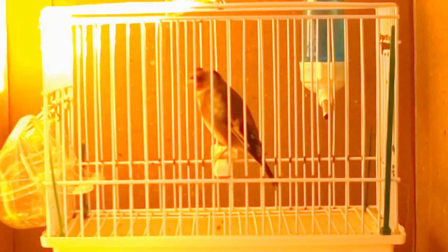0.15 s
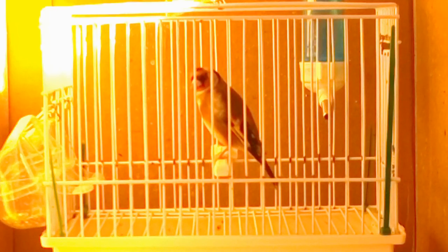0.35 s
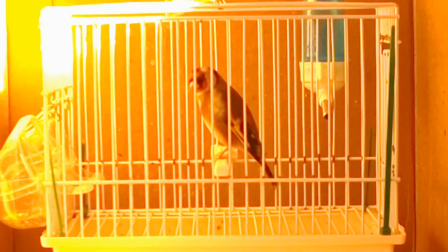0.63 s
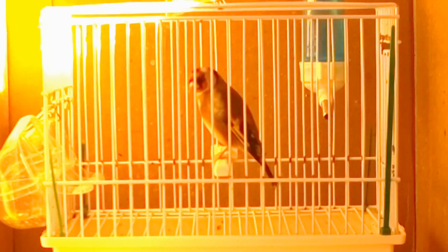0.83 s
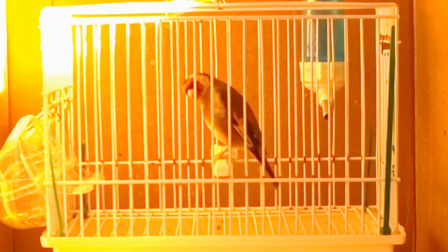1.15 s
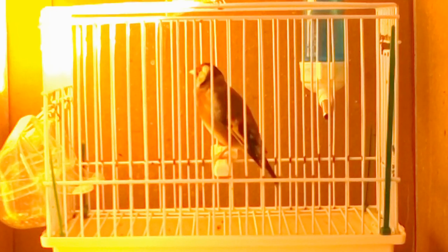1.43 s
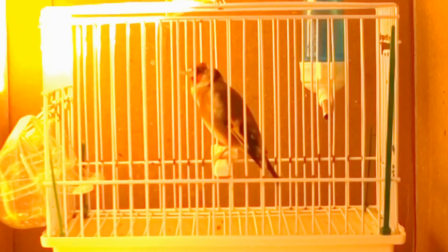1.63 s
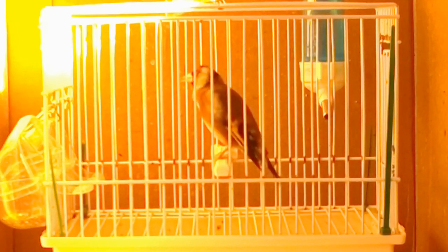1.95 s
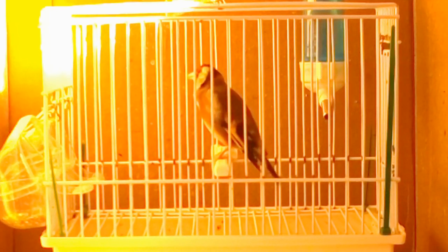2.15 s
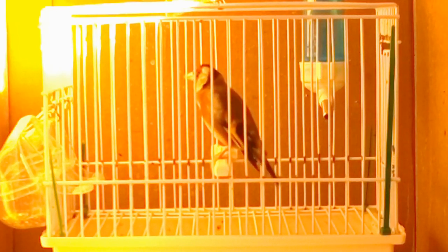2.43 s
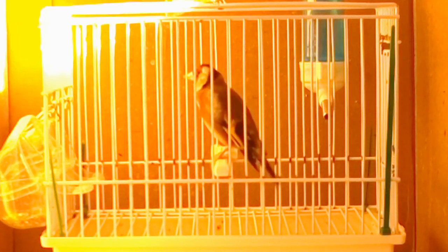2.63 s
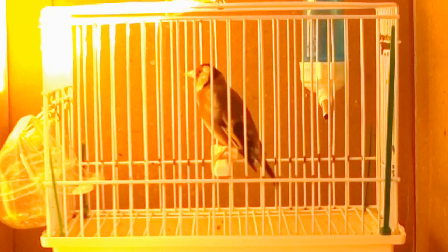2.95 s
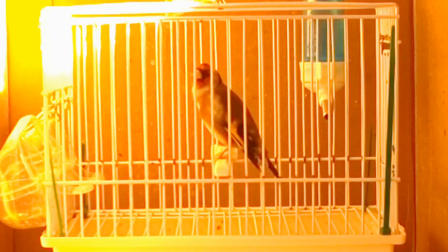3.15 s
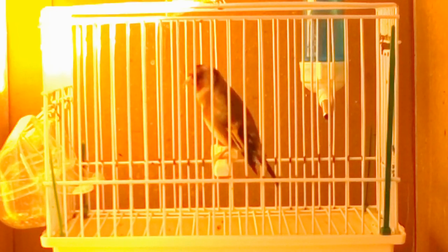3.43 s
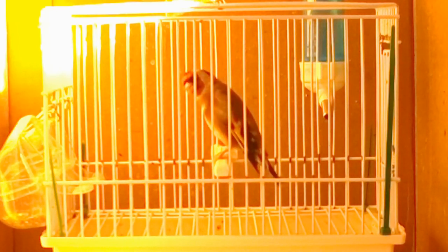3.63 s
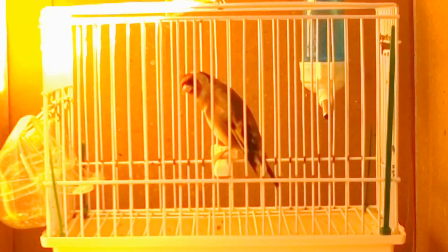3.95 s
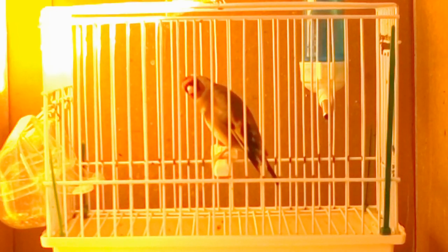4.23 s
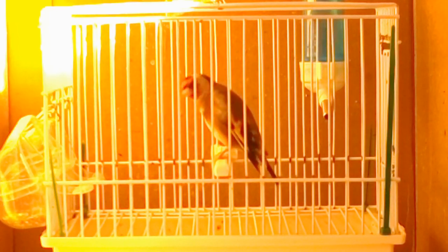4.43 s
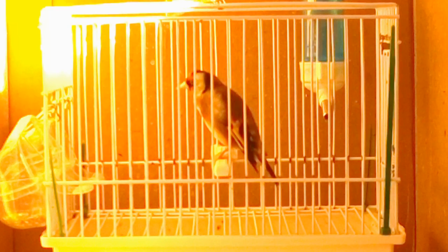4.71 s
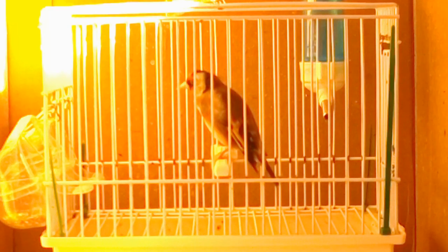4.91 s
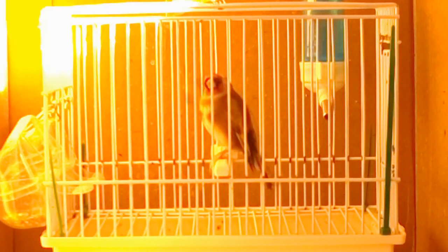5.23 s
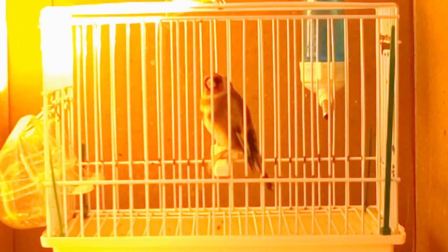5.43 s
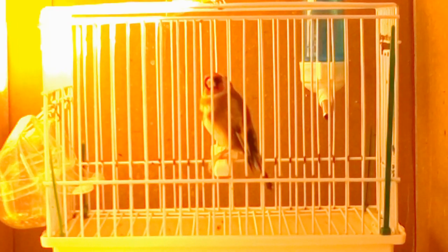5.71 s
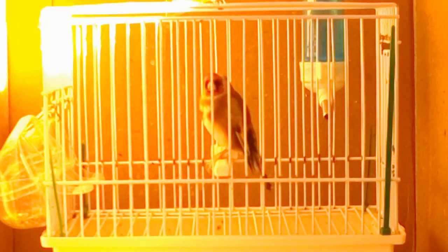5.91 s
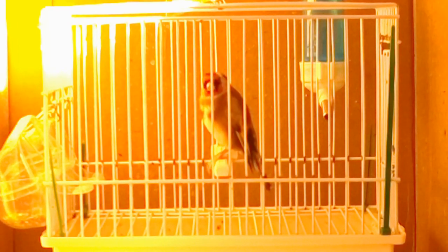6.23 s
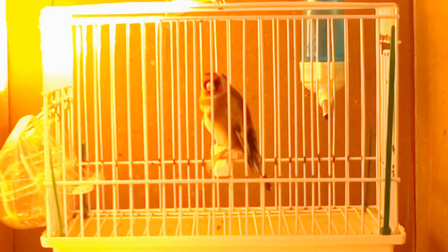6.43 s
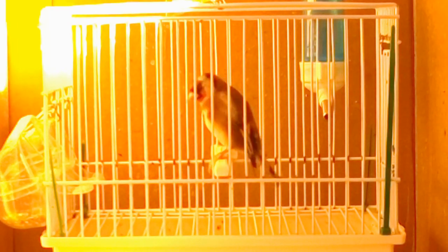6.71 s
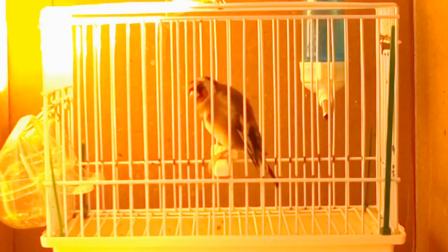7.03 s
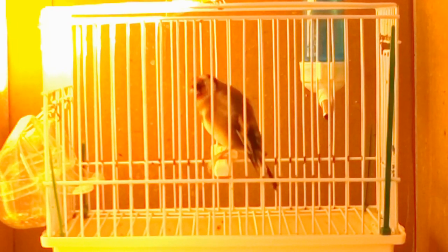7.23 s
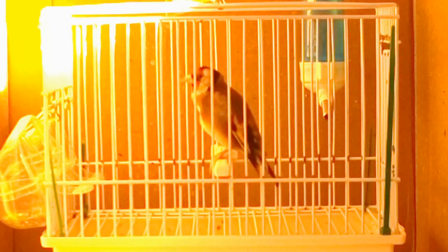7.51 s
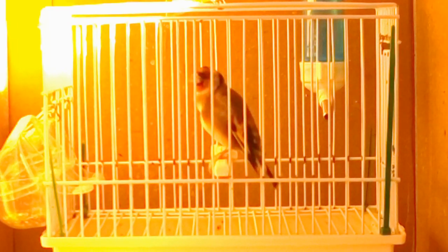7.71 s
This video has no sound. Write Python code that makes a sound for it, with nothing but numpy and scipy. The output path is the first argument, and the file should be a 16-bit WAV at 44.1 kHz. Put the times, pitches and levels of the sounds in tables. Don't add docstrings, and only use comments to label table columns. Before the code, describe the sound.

Indoors, faint distant chirps sound above an airy fan hum and low muffled knocks. After a moment a nearby songbird sings very high, loud, quick phrases: sweeping whistles, repeated downward swoops, sharp ticks and a rattling trill dropping in pitch, all ringing off bare walls. A pause leaves the fan and far birds; finally the bird buzzes twice, lifting after each. The close microphone distorts on peaks.

```python
import sys
import numpy as np
from scipy import signal
from scipy.fft import rfft, irfft, next_fast_len
from scipy.io import wavfile
from scipy.ndimage import uniform_filter1d

SR = 44100
rng = np.random.default_rng(int(sys.argv[2]) if len(sys.argv) > 2 else 0)


def natural_amplitude(level_db):
    exponent = np.asarray(level_db, float) / 20
    return 10 ** exponent


def dump(signal):
    limited = np.clip(np.atleast_2d(signal).T, -1, 1)
    pcm = np.round(limited * 32767).astype(np.int16)
    wavfile.write(sys.argv[1], SR, pcm)


N = 347067


def unit(x):
    return x / np.sqrt(np.mean(x ** 2) + 1e-20)


def along(points, hz):
    f, v = np.transpose(points)
    return np.interp(np.log(hz + 1), np.log(f + 1), v)


def level(rows):
    s, db = np.transpose(rows)
    return natural_amplitude(np.interp(np.arange(N) / SR, s, db))


def noise(response):
    m = next_fast_len(N)
    spectrum = rfft(rng.standard_normal(m)) * response(np.fft.rfftfreq(m, 1 / SR))
    return unit(irfft(spectrum, m)[:N])


def air_and_motor():
    # (frequency [Hz], density [dB per Hz])
    rush_colour = [(53, -46), (90, -22.5), (129, -6), (184, -7), (202, -13), (235, 1.5), (258, -3.5),
                   (445, -4), (558, -7.5), (636, -4), (945, -7), (1040, -7.5), (2460, -16.5), (2760, -18),
                   (8060, -23), (10500, -34), (17700, -120)]
    # (frequency [Hz], width [Hz], level [dB])
    resonances = [(237.4, 9.1, -48), (641, 33, -49), (750.5, 6.8, -52), (916, 14, -49), (958.5, 21, -46.5)]
    # (time [s], level [dB])
    fan_swell = [
        (0, -34),
        (4.97, -33.5),
        (5.08, -37.5),
        (5.44, -34.5),
        (5.79, -34),
        (7.87, -34.1),
    ]
    sound = noise(lambda f: natural_amplitude(along(rush_colour, f)))
    for centre, width, db in resonances:
        drone = noise(lambda f: 1 / (1 + (2 * (f - centre) / width) ** 2))
        sound = sound + natural_amplitude(db + 33) * drone
    return level(fan_swell) * sound


def building_thumps():
    # (frequency [Hz], density [dB per Hz])
    rumble_colour = [(15, -9), (30, 2.5), (55, 8), (90, -1)]
    # (time [s], peak level [dB])
    thumps = [(.13, -54), (.28, -58), (.42, -53), (.83, -54), (1.69, -57), (2.03, -45), (2.17, -61),
              (2.4, -60), (3.032, -50), (3.28, -45), (3.52, -52), (4.64, -46), (5.11, -59), (6.0, -62),
              (6.47, -54), (6.97, -59), (7.55, -58)]
    rise_db_s, fall_db_s, still_db = 155, 110, -72
    rumble = noise(lambda f: natural_amplitude(along(rumble_colour, f)) * (f < 100))
    t = np.arange(N) / SR
    lumps = natural_amplitude(still_db)
    for s, db in thumps:
        lumps = lumps + natural_amplitude(db + np.minimum(rise_db_s * (t - s), fall_db_s * (s - t)))
    return lumps * rumble


def whistle(ms, hz, db, edge_ms):
    # (frequency of the note [Hz], octave level [dB])
    beak_octave = [(1950, 8), (2300, -10), (2800, -11.5), (3300, -40.5), (5000, -33.5), (6500, -62)]
    t = np.arange(int(ms[-1] * SR / 1000)) * 1000 / SR
    pitch = uniform_filter1d(np.interp(t, ms, hz), size=100, mode="nearest")
    phase = 2 * np.pi * np.cumsum(pitch) / SR
    ends = np.clip(np.minimum(t, ms[-1] - t) / edge_ms, 0, 1)
    voice = np.sin(phase) + natural_amplitude(along(beak_octave, pitch)) * np.sin(2 * phase)
    return natural_amplitude(np.interp(t, ms, db)) * ends * voice


def add(track, s, note, hz, direct_db, room_db, early):
    # (frequency [Hz], time to fall 60 dB [s])
    ring_time = [(2500, 0.9), (4000, 0.58), (6000, 0.56), (8000, 0.47)]
    t = np.arange(.75 * SR) / SR
    decay = natural_amplitude(-60 * t / along(ring_time, hz))
    tail = rng.standard_normal(len(t)) * decay * (1 - np.exp(-t / 0.0013))
    tail *= 1 + early * np.exp(-t / 0.013)
    heard = signal.fftconvolve(note, tail * natural_amplitude(room_db) / np.linalg.norm(tail))
    start = round(s * SR)
    track[0, start:][:len(note)] += natural_amplitude(direct_db) * note
    track[1, start:][:len(heard)] += heard


def far_birds():
    # (time [s], end pitch [Hz], peak level [dB])
    chirp_calls = [(0.403, 3790, -26), (.634, 3450, -23.5), (0.758, 3350, -25), (.889, 3370, -27),
                   (1.259, 3590, -26), (4.492, 4170, -30), (4.553, 3860, -22), (4.673, 3460, -24.5),
                   (4.854, 4750, -26.5), (6.090, 4600, -24), (6.215, 3610, -28.5), (6.385, 3550, -26.5),
                   (6.490, 3500, -26), (6.612, 3490, -27)]
    # (time [s], end pitch [Hz], length [ms], peak level [dB])
    whistle_calls = [(5.095, 3830, 35, -55), (5.285, 4470, 32, -38.5), (5.445, 3730, 93, -46),
                     (5.643, 5550, 35, -42.5), (5.735, 4280, 28, -37), (5.822, 5610, 24, -34),
                     (6.000, 5570, 17, -34.5), (6.174, 5470, 32, -35.5), (6.268, 4075, 24, -35),
                     (6.358, 5380, 29, -38.5), (6.440, 4090, 39, -37), (6.535, 5205, 33, -36.5),
                     (6.624, 3940, 26, -34), (6.715, 4670, 24, -38), (6.889, 4615, 58, -39)]
    # (time [s], start pitch [Hz], end pitch [Hz], length [ms], peak level [dB])
    sweep_calls = [(5.790, 8000, 7820, 13, -46), (5.913, 4340, 4180, 49, -37.5),
                   (5.970, 8460, 7600, 16, -48), (6.140, 8070, 7160, 28, -46), (6.320, 8180, 7100, 27, -46),
                   (6.500, 7370, 6700, 29, -42), (6.680, 6270, 5900, 33, -39), (6.850, 6330, 6050, 38, -41),
                   (7.000, 2810, 3230, 22, -41), (7.060, 5950, 5350, 24, -39),
                   (7.090, 3420, 4200, 16, -34.5), (7.190, 2800, 3230, 17, -38),
                   (7.235, 5950, 5400, 16, -35), (7.270, 3630, 4220, 20, -34.5)]
    chirp_from, chirp_ms = .71, 14.8
    sag = 0.013
    chirps = [(s, chirp_from * hz, hz, chirp_ms, db) for s, hz, db in chirp_calls]
    whistles = [(s, (1 + sag) * hz, hz, ms, db) for s, hz, ms, db in whistle_calls]
    whistles += [tuple(row) for row in sweep_calls]

    track = np.zeros((2, N + SR))
    for rows, bend, onset_db, direct_db in ((chirps, .83, -4.5, -8), (whistles, .75, -1.5, -6)):
        for s, start_hz, end_hz, ms, peak_db in rows:
            path = [start_hz, start_hz + bend * (end_hz - start_hz), end_hz]
            db = peak_db + np.array([onset_db, -.6, -1.5])
            note = whistle(np.array([0, ms / 2, ms]), path, db, edge_ms=1.7)
            add(track, s, note, end_hz, direct_db, room_db=4, early=.3)
    return track


def syllable(name):
    settling = {"pickup": (1700, 3100, 28, 16, 17.7), "upper climb": (3650, 4000, 17, 18, 32),
                "hook": (2600, 3600, 6.9, 5.2, 19.5), "held": (3950, 4560, 5.8, 14, 46.5),
                "tick": (6780, 5320, 5.5, 2.9, 33), "peep": (3350, 4250, 3.34, 6.4, 22.8),
                "lift": (3010, 4250, 14.3, 12, 30), "cap": (4050, 4620, 3.9, 5, 14.5)}
    swell = {"pickup": (-8, 0), "upper climb": (-4.5, -9), "hook": (-19, -14.5), "held": (-8, -4),
             "tick": (-10, -12), "peep": (-21, -6), "lift": (-19.5, -8.5), "cap": (-5, -13)}
    # (time [ms], pitch [Hz], level [dB])
    climb = [(0, 2200, -17), (18.5, 2680, -13.5), (39.9, 2800, -11.5), (46.3, 3050, 1), (53.2, 3350, 0.5),
             (63, 3520, -3)]
    # (time [ms], pitch [Hz], level [dB])
    slide = [(0, 4760, -23), (11, 4700, -12), (27.2, 4360, -1), (51, 4250, -6)]
    # (time [ms], pitch [Hz], level [dB])
    arch = [(0, 4600, -9), (2.2, 5300, -9), (5.12, 7150, -15), (16.8, 7000, -14.5), (27.16, 6100, -3),
            (36.9, 4700, 2), (43.7, 4400, -5)]
    # (time [ms], pitch [Hz], level [dB])
    fall = [(0, 5950, -14), (12.2, 5600, -6), (20.04, 4700, -1), (29.64, 3700, -5.5), (45.6, 2900, 2),
            (61.2, 2480, -1), (71.5, 2190, -15.5), (90, 2140, -10.5)]
    # (time [ms], pitch [Hz], level [dB])
    swoop = [(0, 8170, -26.5), (11.75, 7350, -11.5), (16.96, 7050, -8.5), (25.5, 6750, -8.5),
             (27.1, 7100, -4.5), (31.8, 5900, 1), (41.9, 5460, -3.5), (66.8, 5420, -8)]
    # (time [ms], pitch [Hz], level [dB])
    stair = [(0, 2280, -12), (20.4, 2520, -9), (27.6, 2700, -4.5), (36.4, 3120, 3), (44, 3330, -0.5),
             (55, 3414, -16)]
    # (time [ms], pitch [Hz], level [dB])
    whip = [(0, 2300, -27), (8.07, 2840, -13), (17.37, 5090, 5.5), (27, 5700, -6)]
    # (time [ms], pitch [Hz], level [dB])
    dive = [(0, 8450, -10.5), (11.8, 8400, -10.5), (27.8, 7130, -3.5), (47.8, 6450, -13)]
    # (time [ms], pitch [Hz], level [dB])
    buzz = [(0, 6600, -9), (4.95, 6950, -19), (19.24, 6880, -11), (33.8, 6500, -2), (50.6, 6220, -4)]
    # (time [ms], pitch [Hz], level [dB])
    undertone = [(0, 4900, -10), (9.5, 5600, -3), (20.4, 6400, -9), (25.8, 5150, -5), (31.8, 4980, -4),
                 (45.3, 4880, 0)]
    bent = {"climb": climb, "slide": slide, "arch": arch, "fall": fall, "swoop": swoop, "stair": stair,
            "whip": whip, "dive": dive, "buzz": buzz, "undertone": undertone}
    if name in bent:
        return np.transpose(bent[name])
    start_hz, end_hz, settle_ms, loud_ms, long_ms = settling[name]
    onset_db, end_db = swell[name]
    ms = np.arange(17) / 16 * long_ms
    hz = end_hz + (start_hz - end_hz) * np.exp(-ms / settle_ms)
    return ms, hz, np.interp(ms, [0, loud_ms, long_ms], [onset_db, 0, end_db])


def song():
    opening = {"pickup": [(1.379, 2380, 0.84, -33)], "climb": [(1.396, 3474, .92, -16),
               (1.672, 3670, 1.14, -16.5)], "upper climb": [(1.4, 4030, 0.94, -30),
               (1.67, 3950, 1.45, -23)], "slide": [(1.445, 4130, 0.94, -16), (1.73, 4343, .72, -9.5)],
               "arch": [(1.503, 4260, .9, -17), (1.783, 4390, 0.89, -14)],
               "fall": [(1.508, 2160, .92, -24.5), (1.791, 2215, 0.92, -17.5)]}
    later = {"swoop": [(1.938, 5483, 1.04, -3.5), (2.12, 5600, .86, 0), (2.3115, 5524, 0.83, -1),
             (2.5045, 5357, .9, -0.5), (2.6935, 5233, 0.83, 0.4)], "whip": [(3.5534, 5760, 0.93, -6.5)],
             "dive": [(3.643, 6300, .93, -13)], "buzz": [(7.342, 6100, 0.96, -5.5), (7.747, 6265, 0.93, 0)],
             "undertone": [(7.3415, 4900, 1, -20), (7.746, 5050, 0.75, -13.5)],
             "lift": [(7.4355, 4300, 1, -5), (7.5475, 4070, 1, -5.5), (7.8445, 4080, 0.91, -5.5)],
             "cap": [(7.466, 4450, 0.88, -6), (7.577, 4470, 1.09, -6)]}
    # (hook time [s], held note lag [ms])
    hooks = [(2.0345, 23.6), (2.2215, 25), (2.4075, 23), (2.6015, 26.6)]
    # (tick time [s], stair lead [ms], stair level [dB], peep lag [ms], peep level [dB])
    ticks = [(2.884, 71, -19.5, 21.3, -2), (3.0515, 65, -16.5, 23.8, -2), (3.2325, 66, -16, 20, -5),
             (3.417, 68, -18, 20, -5.5)]
    drifts = {"hook": (3438, -6, -8, -0.14), "held": (4535.5, -15.5, -8.5, -1),
              "tick": (5329, 2.5, -5, 0.76)}
    stair_hz, peep_hz, peep_sag_hz = 3374, 4020, 27
    peep_slows = 0.203

    def drifting(name, s, k):
        first_hz, hz_step, first_db, db_step = drifts[name]
        return name, s, first_hz + k * hz_step, 1, first_db + k * db_step

    rows = [(name, *row) for part in (opening, later) for name in part for row in part[name]]
    for k, (s, lag_ms) in enumerate(hooks):
        rows += [drifting("hook", s, k), drifting("held", s + lag_ms / 1000, k)]
    for k, (s, lead_ms, stair_db, lag_ms, peep_db) in enumerate(ticks):
        rows.append(("stair", s - lead_ms / 1000, stair_hz, 1, stair_db))
        rows.append(drifting("tick", s, k))
        rows.append(("peep", s + lag_ms / 1000, peep_hz - k * peep_sag_hz, 1 + k * peep_slows, peep_db))
    return rows


def add_trill(track):
    # (time [s], low pitch [Hz], high pitch [Hz], effort [dB])
    trill_fall = [(3.693, 5500, 6900, -4.5), (3.73, 4880, 6380, -8), (3.77, 3940, 6090, -7),
                  (3.81, 3330, 5850, -7), (3.858, 3060, 5460, -5.5), (3.9, 2580, 4030, -10.5),
                  (3.941, 2480, 3620, -13)]
    slow_stroke_s, fast_stroke_s = .0132, .01062
    scatter = [1.6, .0005, .06]
    trill = np.zeros(SR // 2)
    times, *controls = np.transpose(trill_fall)
    for after in np.cumsum([0] + 4 * [slow_stroke_s] + 18 * [fast_stroke_s]):
        low_hz, high_hz, effort_db = (np.interp(times[0] + after, times, c) for c in controls)
        louder, later, wider = rng.standard_normal(size=3) * scatter
        reach = (high_hz - low_hz) * (1 + wider)
        path = low_hz + reach * np.array([.35, 0, .4, .95, .9])
        db = effort_db + louder + np.array([-6, -12.5, 2.0, -2.0, -13])
        note = whistle(np.array([0, 2.2, 4.6, 7.5, 9.5]), path, db, edge_ms=1.1)
        trill[round(max(after + later, 0) * SR):][:len(note)] += note
    trill = np.trim_zeros(trill, "b")
    add(track, times[0] - .002, trill, 4500, direct_db=-.7, room_db=0.3, early=0.67)


def finch():
    track = np.zeros((2, N + SR))
    for name, s, end_hz, stretch, peak_db in song():
        ms, hz, db = syllable(name)
        note = whistle(ms * stretch, hz * end_hz / hz[-1], db + peak_db, edge_ms=1.03)
        add(track, s, note, end_hz, direct_db=1.23, room_db=2.0, early=0.62)
    add_trill(track)
    return track


def thin_top(x):
    # (frequency [Hz], level [dB])
    splash = [(8000, -37), (9000, -40.5), (11500, -37), (12300, -44), (13000, -70)]
    haze_hz = 8380
    mask_db, mask_scatter_db = -39, 4
    hz, _, z = signal.stft(x, SR, nperseg=1024)
    power = np.abs(z[..., :512, :].reshape(32, 16, -1)) ** 2
    bands = np.sqrt(np.mean(power, axis=1))
    bands = np.hypot(bands, bands.max(axis=0) * natural_amplitude(along(splash, hz[8::16]))[:, None])
    chance = unit(uniform_filter1d(rng.standard_normal(bands.shape), size=7, axis=1))
    kept = bands * (bands > bands.max(axis=0) * natural_amplitude(mask_db + mask_scatter_db * chance))
    hiss = signal.stft(rng.standard_normal(x.shape), SR, nperseg=1024)[2]
    hiss = hiss / np.sqrt(np.mean(np.abs(hiss) ** 2))
    fresh = hiss * kept[np.minimum(np.arange(513) // 16, 31)]
    cleaned = np.where(hz[:, None] > haze_hz, fresh, z)
    return signal.istft(cleaned, SR, nperseg=1024)[1][:, :N]


def scene():
    # (frequency [Hz], level [dB])
    wall_colour = [(2200, -5.5), (3200, -5), (4200, -1), (5500, -1), (7000, 3), (9000, 3.5), (12000, -9.5)]
    direct, echo = far_birds() + finch()
    wall_gain = natural_amplitude(along(wall_colour, np.fft.rfftfreq(len(echo), 1 / SR)))
    echo = irfft(rfft(echo) * wall_gain, len(echo))
    return ((direct + echo)[:N] + air_and_motor() + building_thumps())[None]


def band_limit(x):
    return signal.sosfilt(signal.butter(12, 12600, fs=SR, output="sos"), x)


def record(dry):
    wet = dry + natural_amplitude(-53.0) * rng.standard_normal(dry.shape)
    sums = signal.lfilter([1, -2, 1], 1, dry * dry)
    wet = thin_top(wet + natural_amplitude(-36) * sums)
    hot = wet / (1 + np.abs(wet / 0.97) ** 24) ** (1 / 24)
    return band_limit(hot)


dry = scene()
out = record(dry)
dump(out)
```